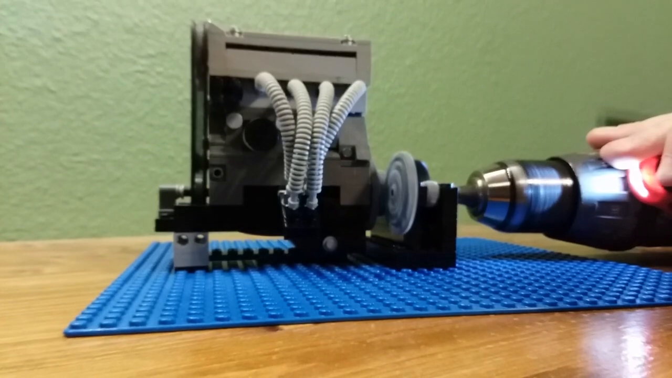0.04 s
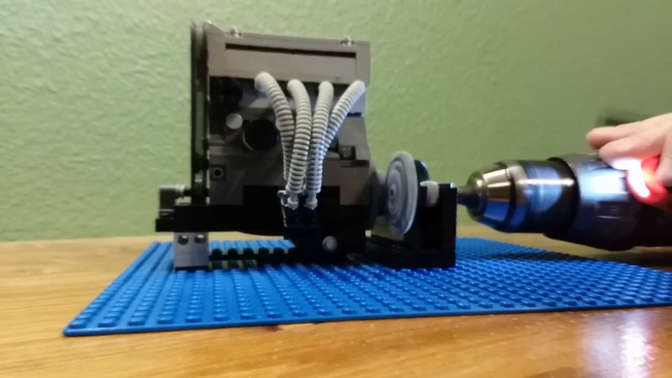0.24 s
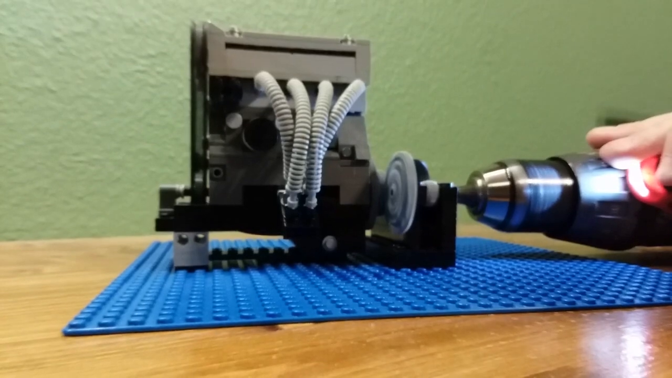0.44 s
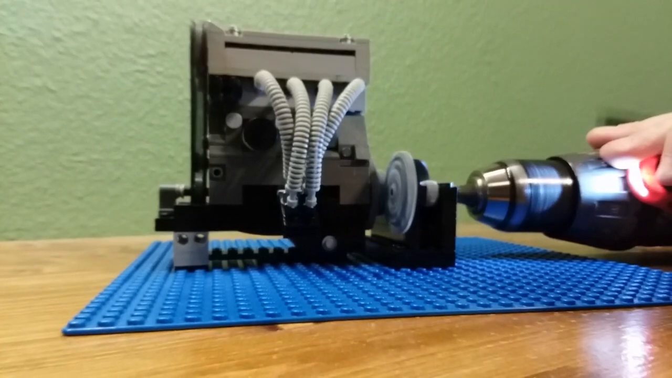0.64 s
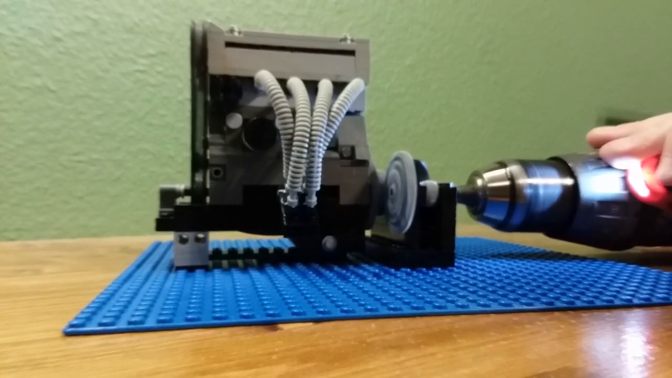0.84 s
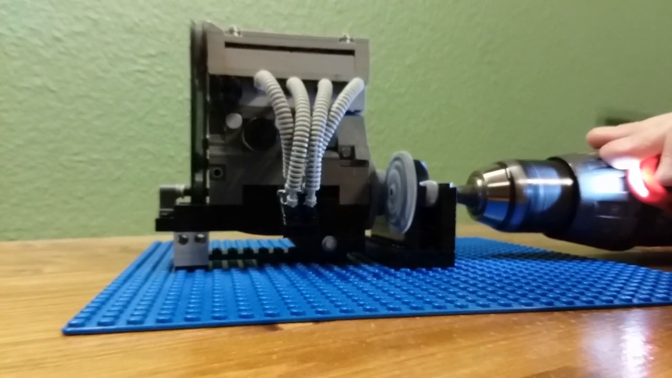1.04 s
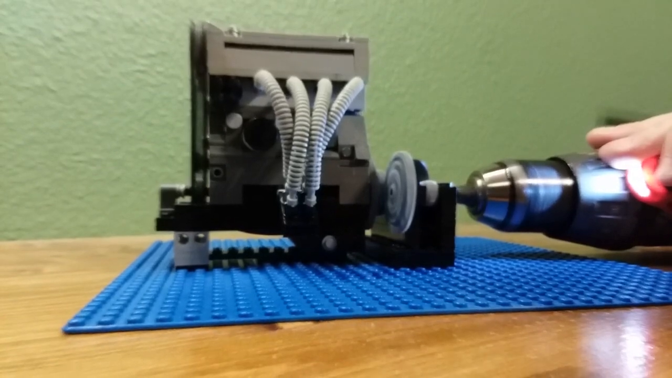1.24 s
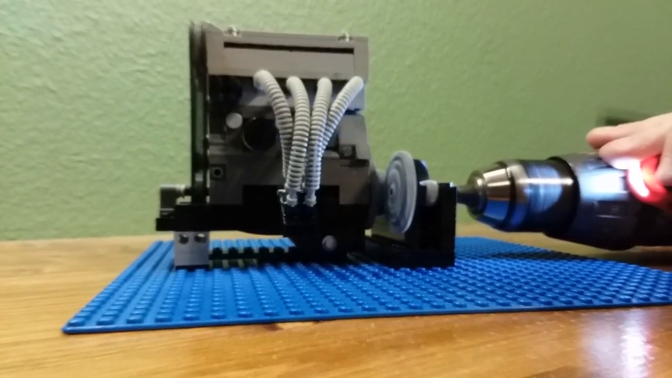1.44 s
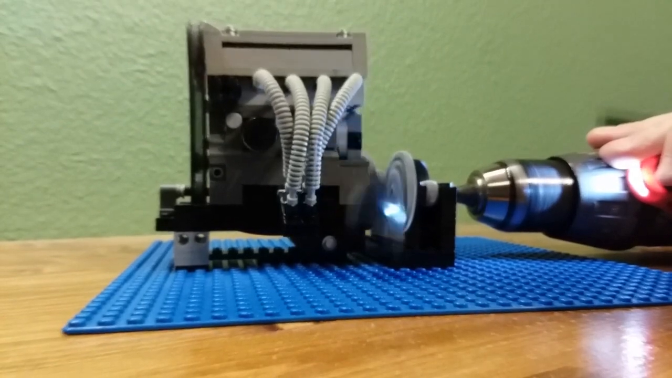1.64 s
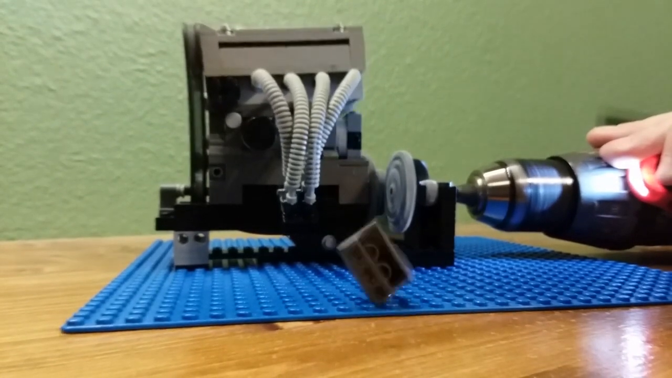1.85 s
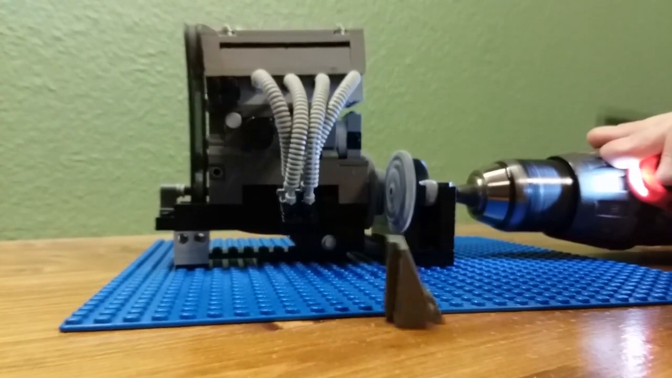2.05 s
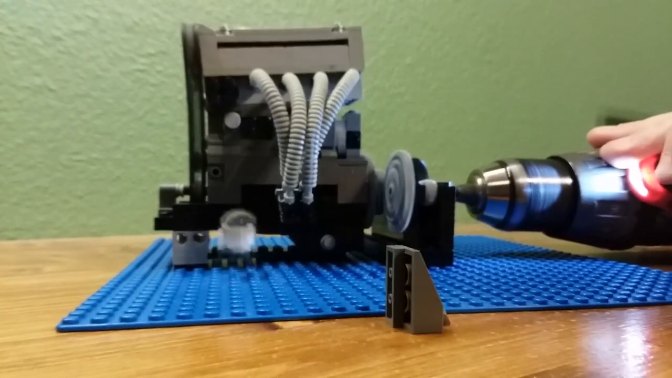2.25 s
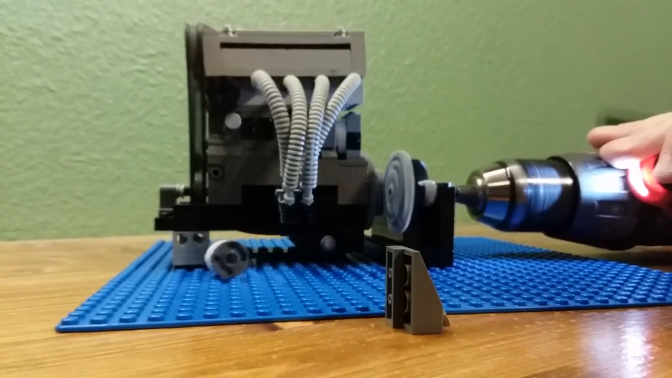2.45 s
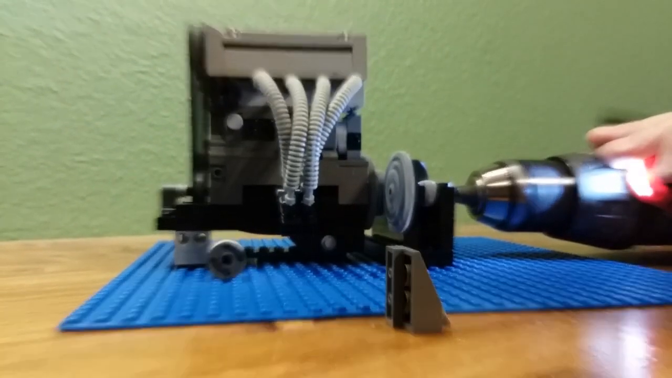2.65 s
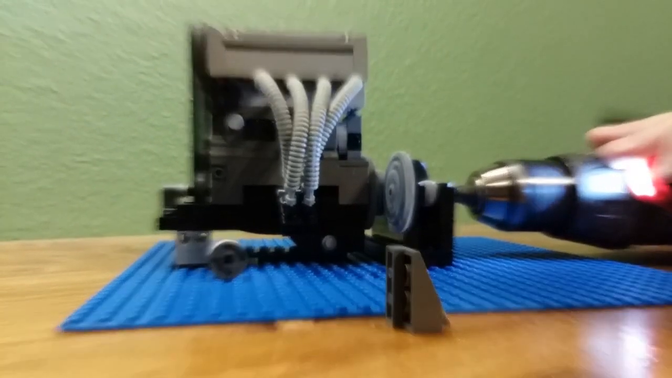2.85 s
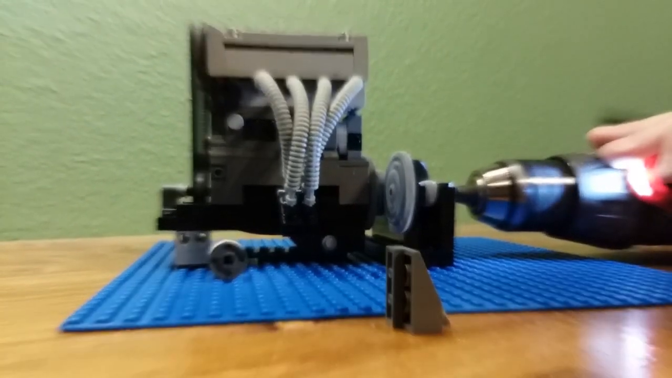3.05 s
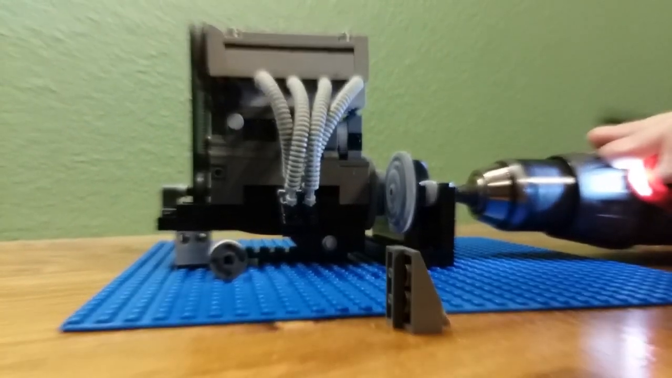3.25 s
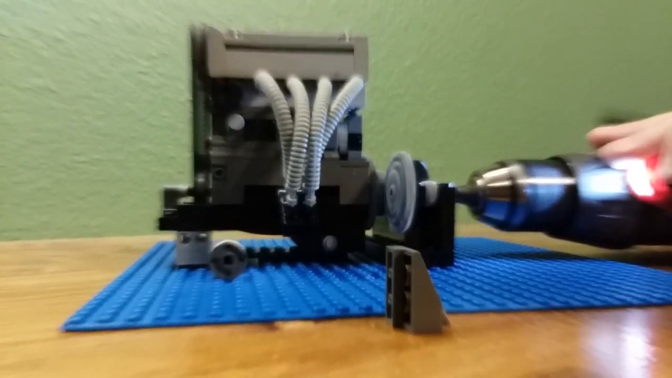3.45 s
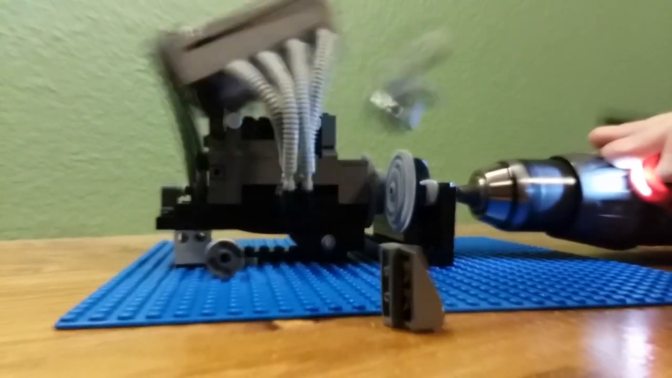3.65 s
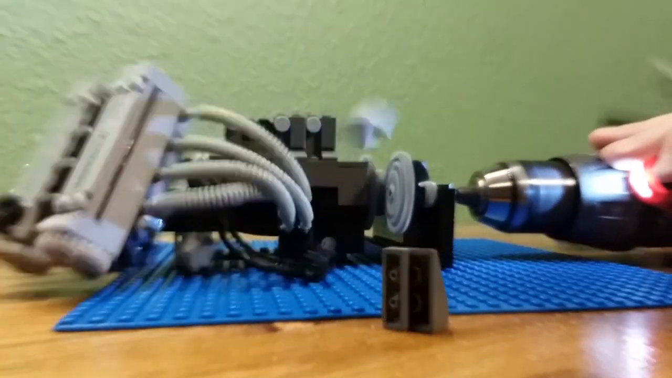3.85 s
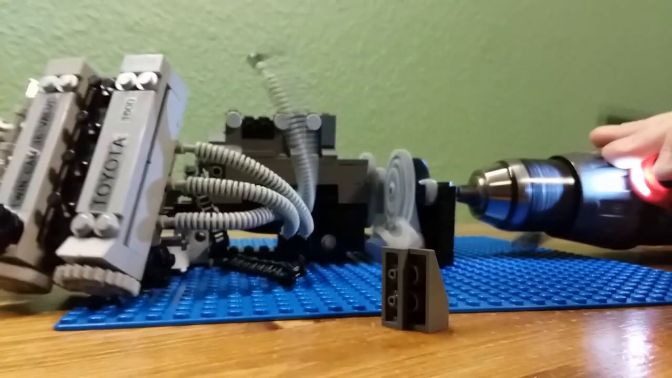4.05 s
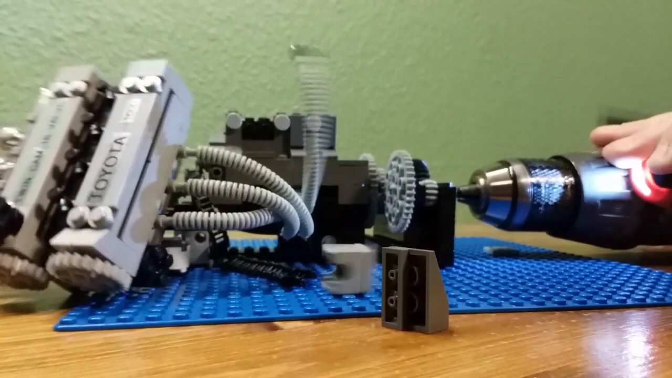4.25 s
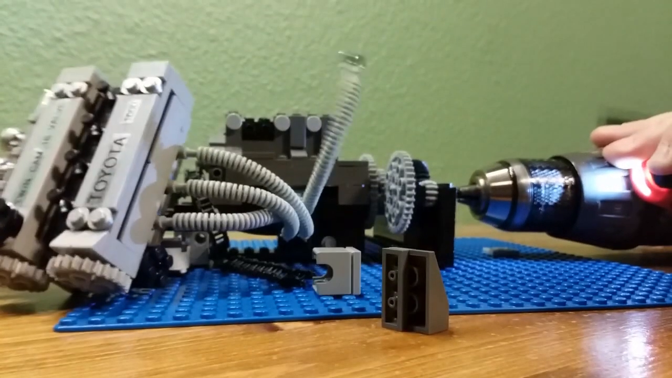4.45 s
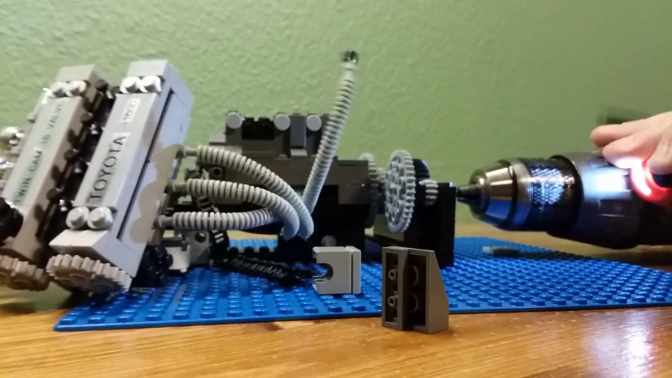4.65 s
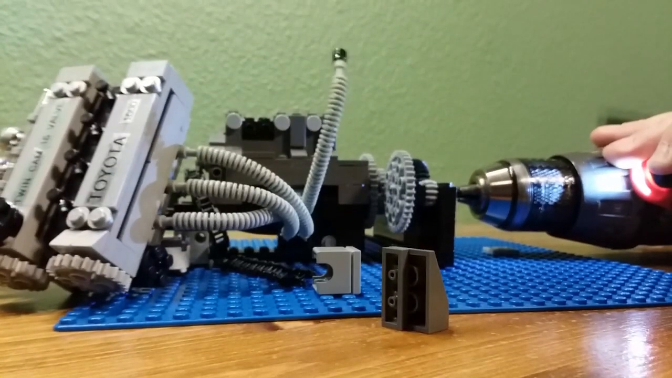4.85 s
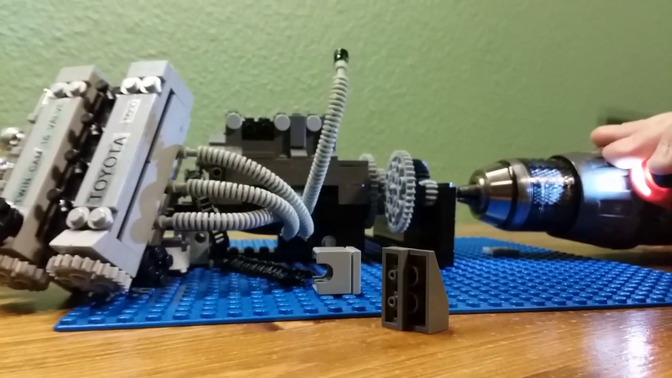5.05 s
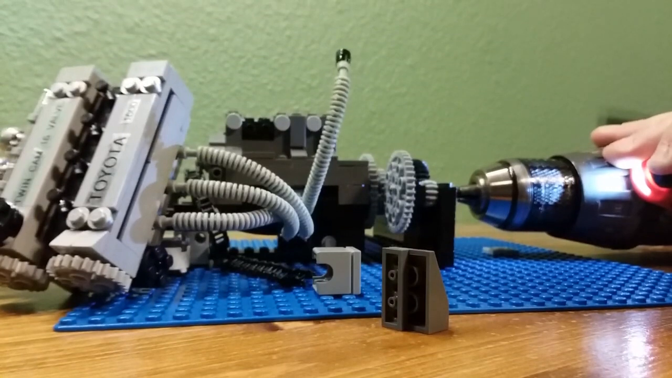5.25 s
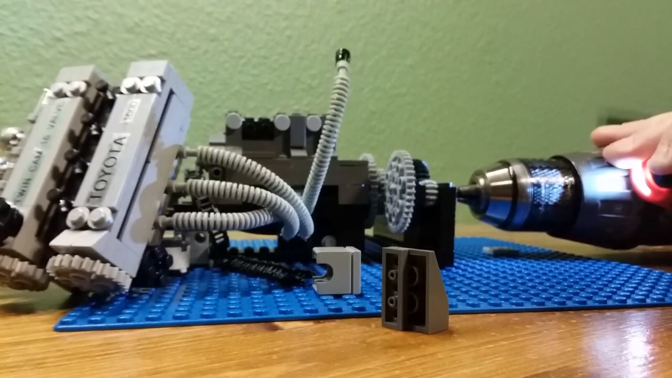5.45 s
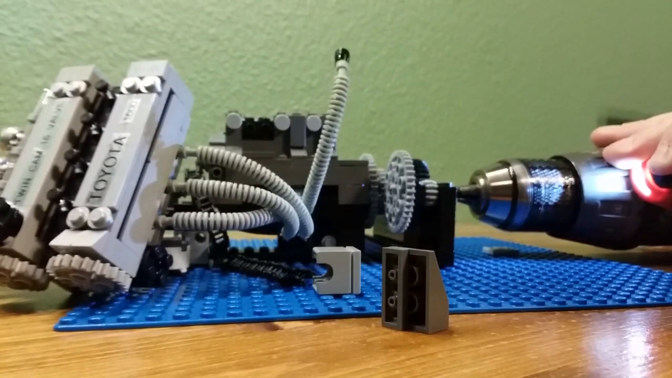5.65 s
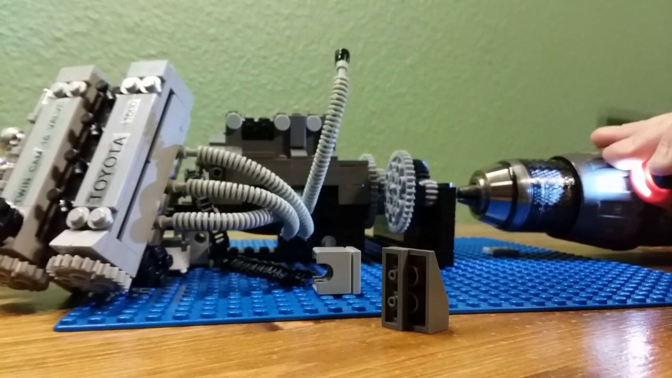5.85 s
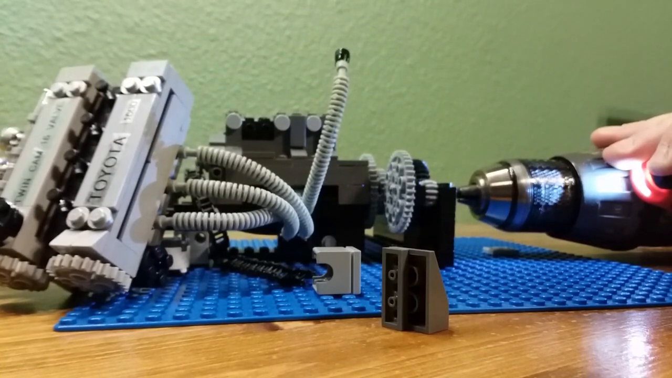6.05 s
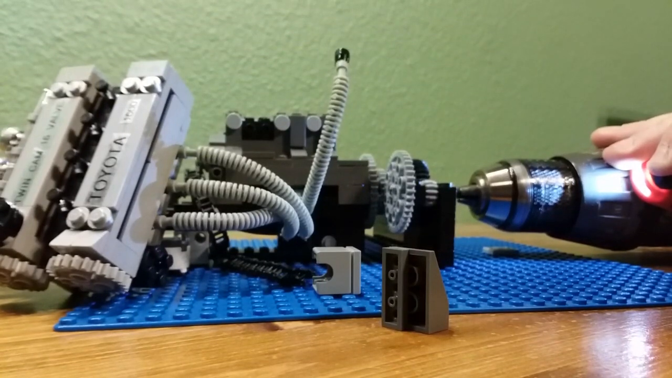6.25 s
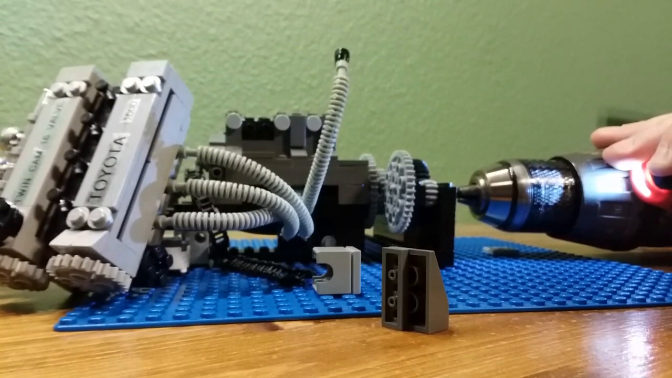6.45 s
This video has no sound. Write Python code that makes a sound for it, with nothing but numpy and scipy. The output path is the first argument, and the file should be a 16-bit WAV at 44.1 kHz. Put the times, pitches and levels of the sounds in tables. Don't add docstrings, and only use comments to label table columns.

```python
import sys
import numpy as np
from scipy import signal
from scipy.fft import rfft, irfft, next_fast_len
from scipy.io import wavfile
from scipy.ndimage import uniform_filter1d

SR = 44100
rng = np.random.default_rng(int(sys.argv[2]) if len(sys.argv) > 2 else 0)


def field_ratio(decibels):
    return 10 ** (np.asarray(decibels, dtype=float) / 20)


def digitize_waveform(pressure):
    field = np.atleast_2d(pressure).T
    bounded = np.clip(field, -1, 1)
    quanta = np.round(bounded * 32767).astype(np.int16)
    wavfile.write(sys.argv[1], SR, quanta)


N = 287091
TIME = np.arange(N) / SR
SURGE_S, BURST_S, RELEASE_S, STOP_S = 3.67, 3.75, 3.88, 4.26


def unit(x):
    return x / np.sqrt(np.mean(x ** 2))


def stereo(left, right):
    return np.array([[left], [right]])


def colour(x, hz, db):
    size = next_fast_len(x.shape[-1] + 4096)
    log_hz = np.log(np.arange(size // 2 + 1) * SR / size + 1)
    gain = field_ratio(np.interp(log_hz, np.log(hz), db))
    return irfft(rfft(x, size) * gain, size)[..., :x.shape[-1]]


def band(x, hz, width_hz):
    return signal.lfilter(*signal.iirpeak(hz, hz / width_hz, SR), x)


def walk(rate_hz):
    hold = int(SR / rate_hz)
    steps = np.repeat(rng.standard_normal(N // hold + 1), hold)
    return 1.3 * uniform_filter1d(uniform_filter1d(steps, hold), hold)[:N]


def ramp(start_s, length_s):
    return np.clip((TIME - start_s) / length_s, 0, 1)


def ports(make, shared, lag=20):
    shared = np.clip(shared, 0, 1)
    direct = make()
    return np.array([np.sqrt(shared) * np.roll(direct, k) + np.sqrt(1 - shared) * make() for k in (lag, 0)])


# (frequency [Hz], level [dB per Hz])
HUSH_SPECTRUM = [(18, -39), (30, -9), (93, -9), (165, -10.5), (183, -25), (392, -19), (566, -26.5),
                 (1660, -38.5), (10900, -46), (15800, -47)]


def hush():
    noise = unit(colour(rng.standard_normal((2, N)), *np.transpose(HUSH_SPECTRUM)))
    return noise * field_ratio(-68 + 1.5) * field_ratio(np.interp(TIME, [5.28, 5.5], [-8, 0]))


def room(x):
    t60_s, treble_t60_s, rise_s, level_db = 0.23, 0.18, 0.0021, -1.5
    t = TIME[:SR // 2]
    noise = rng.standard_normal((2, len(t)))
    low = colour(noise, [5000, 9000], [0, -30])
    tail = low * field_ratio(-60 * t / t60_s) + (noise - low) * field_ratio(-60 * t / treble_t60_s)
    tail = tail * (1 - np.exp(-t / rise_s))
    tail = tail / np.sqrt(np.sum(tail ** 2, axis=1, keepdims=True))
    return field_ratio(level_db) * signal.fftconvolve(x, tail, axes=1)[:, :N]


# (time [s], frequency [Hz], level [dB], T60 [s])
SINGING_PARTS = [(4.025, 3774, -25, .08), (4.29, 150, -41, .17), (4.307, 5950, -35, .2),
                 (4.362, 150, -34, .1), (4.43, 310, -48, .55), (4.45, 5860, -41, .2),
                 (4.581, 150, -55, .26), (4.728, 305, -58, .8), (4.861, 307, -59, .5),
                 (4.951, 312, -62, .5), (5.31, 5900, -40, .34), (5.329, 220, -50, .7),
                 (5.33, 115, -46, .75), (5.331, 880, -52, .65)]


def rings():
    out, t = np.zeros((2, N)), TIME[:SR // 2]
    for s, hz, db, t60_s in SINGING_PARTS:
        wander = np.cumsum(rng.standard_normal((2, len(t))), axis=1)
        wander = wander * np.sqrt(2 * np.pi * (5 + hz / 70) / SR)
        song = np.sqrt(2) * np.sin(2 * np.pi * hz * t + wander)
        i = int(s * SR)
        out[:, i:i + len(t)] += song * field_ratio(db - 60 * t / t60_s) * np.clip(t / 0.0055, 0, 1)
    return out


# (time [s], level [dB], hold [s], fade [dB per s])
SHOWERS_OF_BRICKS = [
    (3.9, -15, 0.15, 68),
    (4.728, -46, .01, 88.5),
    (4.856, -46, 0.15, 249.5),
]
# (frequency [Hz], level [dB per Hz])
BRICK_CLICK = [(80, -23), (150, -9.5), (310, 0.5), (450, -4), (1100, -3), (1700, -6), (2400, -4),
               (3300, -9), (4300, -14), (6000, -16.5), (7200, -20.5), (8800, -36.5), (11600, -21.5),
               (15800, -31)]


def skitter():
    gain = 0
    for s, db, hold_s, fade_db in SHOWERS_OF_BRICKS:
        fade = field_ratio(db - fade_db * np.clip(TIME - s - hold_s, 0, 1))
        gain = gain + (TIME > s) * fade * (TIME < s + 1)
    ticks = (rng.random((2, N)) < 200 / SR) * rng.standard_normal((2, N))
    ticks = colour(colour(ticks, *np.transpose(BRICK_CLICK)), [4000, 8000], [0, -16])
    return unit(ticks) * gain * field_ratio(-14.5 + stereo(1, -1))


# (time [s], peak level [dB], ring [Hz], treble [dB])
LOOSE_BRICKS = [(1.519, -14, 1920, 22), (2.039, -25, 1930, 5), (3.716, -12.5, 1670, 0),
                (3.739, -10.5, 2250, 2), (3.877, -12.5, 2220, 7), (4.082, -13, 4100, 6),
                (4.116, -17, 643, -3), (4.218, -25, 1720, 4), (4.235, -15, 1810, -7.5),
                (4.244, -25, 1190, -2), (4.269, -24.5, 1820, -2), (4.308, -23.5, 930, 9),
                (4.339, -20, 2290, 3), (4.369, -41, 2340, 14), (4.394, -30, 2290, -26),
                (4.419, -23.5, 1080, -7), (4.449, -32, 2520, 3), (4.478, -35, 1920, -2),
                (4.494, -28, 1240, -2), (4.53, -31, 1700, 1), (4.576, -27, 1350, -2),
                (4.722, -35.5, 2200, 0), (4.78, -41.5, 980, -1), (4.854, -36.5, 526, -37),
                (4.898, -41, 900, -30), (4.943, -37, 1320, -27.5), (5.013, -39, 1000, -29),
                (5.309, -23.5, 3400, -1), (5.318, -21.5, 850, -1.5), (5.334, -20.5, 3500, -3.5)]


def debris():
    near, far, t = np.zeros((2, N + 4096)), np.zeros((4, 2, N + 4096)), TIME[:4096]
    hz, db = np.transpose(BRICK_CLICK)
    for k, (s, peak_db, ring_hz, treble_db) in enumerate(LOOSE_BRICKS):
        crack = rng.standard_normal(len(t)) * field_ratio(-60 * t / 0.026)
        thud_db = -7 + 0.53 * (peak_db + 25)
        tilt = np.interp(hz, [350, 600, 3800, 8000], [thud_db, 0, 0, treble_db])
        hit = unit(colour(crack, hz, db + tilt)) + field_ratio(-11) * unit(band(crack, ring_hz, 150))
        hit = field_ratio(peak_db - 13 + stereo(1.75, -1.75)) * hit
        i = int(s * SR)
        far[k % len(far), :, i:i + len(t)] += hit
        direct = field_ratio(.45 * peak_db + 6.5 - 60 * t / .018) * np.clip(t / .001, 0, 1)
        near[:, i:i + len(t)] += hit * direct
    return near[:, :N] + sum(room(place[:, :N] + skitter()) for place in far)


# (time [s], level [dB])
HEAVY_PARTS = [
    (3.727, -28),
    (4.013, -9.5),
    (4.0318, -18),
]
# (frequency [Hz], level [dB], T60 [s])
WOOD_MODES = [(140, 0, .085), (320, -3, .15), (500, -1, .06), (590, -5, .045)]


def landings():
    out, t = np.zeros(N + 8192), TIME[:8192]
    knock = sum(field_ratio(db - 60 * t / t60_s) * np.sin(2 * np.pi * hz * t) for hz, db, t60_s in WOOD_MODES)
    knock = knock * np.clip(t / 0.0047, 0, 1)
    for s, db in HEAVY_PARTS:
        i = int(s * SR)
        out[i:i + len(t)] += field_ratio(db) * knock
    return out[:N] * field_ratio(stereo(1, -1))


# (time [s], piston beat [Hz])
BEAT_SPEED = [(0, 78.5), (.12, 79.6), (.85, 79.9), (1.17, 80.5), (2.05, 80), (2.41, 80.6), (2.525, 66),
              (2.63, 55.8), (2.75, 51), (3.08, 47.5), (3.45, 47.4), (3.56, 53), (3.62, 61), (3.69, 67),
              (3.72, 94), (3.745, 108), (3.85, 102), (3.905, 82)]


def speed():
    s, hz = np.transpose(BEAT_SPEED)
    return np.interp(TIME, s, hz) * np.exp(-np.clip(TIME - s[-1], 0, None) / .37)


def loudness(beat_hz, full_speed_db, per_octave_db, fade_db_s):
    octaves = np.minimum(np.log2(beat_hz / 80), .08)
    return full_speed_db + per_octave_db * octaves - fade_db_s * np.clip(TIME - RELEASE_S, 0, None)


# (start [s], length [s], loss [dB])
LOST_PARTS = [
    (1.559, 0.58, -4),
    (3.72, .08, -0.5),
]


def missing():
    return sum(db * ramp(s, length_s) for s, length_s, db in LOST_PARTS)


def wobble(phase):
    late = TIME - 3.84
    db = -14 + np.where(late < 0, 82, -704) * late
    return field_ratio(np.clip(db, -120, 0)) * ramp(3.69, .03) * np.sin(phase)


def load():
    both = -5 * np.exp(-TIME / .1) - 25 * ramp(4.05, .1)
    fast = 6 * ramp(SURGE_S, .05) - 15 * ramp(BURST_S, .02) + 9 * ramp(RELEASE_S, .03)
    return both + 1.3 * missing() + 0.27 * fast, both + fast


# (multiple of the beat, wobble share,
# low [Hz], high [Hz], left level [dB], right level [dB], left lag [samples])
GEAR_MESHES = [(24, .013, 1800, 2050, -25, -19, 23), (15.1, .007, 1150, 1300, -22, -34, 20),
               (41.7, .0012, 2680, 4600, -29.5, -25, 11), (52, .002, 2640, 2920, -32.5, -26.5, 11),
               (72.2, .001, 3300, 3600, -42, -36, 11), (20.9, .008, 1780, 2400, -18, -14, 20)]
# (frequency [Hz], level [dB])
HOUSING_RESPONSE = [(2450, 0), (2800, 4), (2950, -3), (3100, 2), (3230, -9), (3310, 0), (3500, -4),
                    (4600, 0)]


def whine(beat_hz):
    out, (slow_db, fast_db) = 0, load()
    for k, wobble_share, low_hz, high_hz, left_db, right_db, lag in GEAR_MESHES:
        hz = k * beat_hz
        outside_hz = np.clip(low_hz - hz, 0, None) + np.clip(hz - high_hz, 0, None)
        db = np.interp(hz, *np.transpose(HOUSING_RESPONSE)) - .12 * outside_hz + 2.1 * walk(50)
        db = db + (fast_db if k > 40 else slow_db)
        tone = field_ratio(db) * np.sin(np.cumsum(2 * np.pi * hz * (1 + wobble_share * walk(60)) / SR))
        out = out + field_ratio(stereo(left_db, right_db)) * np.array([np.roll(tone, lag), tone])
    return out


def grit(phase, depth, half, spread_db, grain_count):
    size = field_ratio(spread_db * rng.exponential(size=N // grain_count + 1))
    size = np.repeat(size, grain_count)[:N]
    gate = np.exp(depth * np.cos(2 * phase) + half * np.cos(phase))
    return unit(rng.standard_normal(N) * size * gate)


# (frequency [Hz], left level [dB], right level [dB])
MOTOR_SPECTRUM = [(500, -26.5, -7.5), (1610, 0, 2), (2680, -5.5, -4), (3970, -9, -8), (6050, -10, -10),
                  (7000, -6, -12.5), (7000, -12.5, -10), (9070, -20, -18), (11640, -13, -14.5),
                  (11050, -4.5, -21), (12000, -8.5, -11), (14100, -10, -13.5), (16500, -17.5, -14)]


def whirr(phase):
    hz, *sides = np.transpose(MOTOR_SPECTRUM)
    hiss = ports(lambda: grit(phase, 0.064, 0.12, 1.8, grain_count=40), 0.28)
    hiss = np.array([colour(h, hz, db) for h, db in zip(hiss, sides)])
    return unit(hiss) * field_ratio(walk(8.47))


# (multiple of the beat, left level [dB], right level [dB])
TABLE_BEATS = [(1, -27.5, -15.5), (2, 2, -6), (3, -9.5, -9.5), (4, -7, -12.5), (7, -17, -21),
               (7.18, -9, -22.5)]
# (frequency [Hz], level [dB])
TABLE_SHUDDER = [(25, -28.5), (45, -10), (90, -6.5), (150, 2.5), (220, -9), (320, -7.5), (480, -8.5),
                 (620, -9.5), (800, -14), (1100, -38.5)]


def rumble(phase):
    beats = 0
    for k, left_db, right_db in TABLE_BEATS:
        level = field_ratio(stereo(left_db, right_db) + 0.63 * walk(35))
        beats = beats + level * np.sin(k * phase + .3 * walk(25))
    shudder = ports(lambda: rng.standard_normal(N), 0.54, lag=0)
    shudder = unit(colour(shudder, *np.transpose(TABLE_SHUDDER)))
    return unit(beats * field_ratio(1) + shudder * field_ratio(1.5 * walk(7.7)))


# (frequency [Hz], width [Hz], left level [dB], right level [dB])
BRICK_WALLS = [(874.5, 63, -0.5, -1.5), (1102, 190, 2.5, -15), (1211.6, 106, 5, -12.5),
               (1333, 45, 2.5, -10.5), (1480, 160, -3, -3.5), (1670, 85, 3, -14), (2290, 360, -7.5, -8.5),
               (3060, 760, -11.5, -13.5)]


def rattle(phase):
    taps = ports(lambda: grit(phase, 0.13, .1, 2.0, grain_count=20), 0.39)
    out = 0
    for hz, width_hz, left_db, right_db in BRICK_WALLS:
        wall = band(band(taps, hz, 1.43 * width_hz), hz, 1.43 * width_hz)
        out = out + field_ratio(stereo(left_db, right_db) + 0.26 * walk(16)) * wall
    return unit(out)


def scene():
    hz = speed()
    phase = np.cumsum(2 * np.pi * hz / SR)
    rattle_db = loudness(hz, -15, 4, 30) + missing() - 3 * np.exp(-TIME / .04)
    rumble_db = loudness(hz, -20, 8, 20) - 1.5 * ramp(BURST_S, .05)
    rumble_db = rumble_db - 2 * np.clip(46 - hz, 0, None)
    motor_db = loudness(hz, -16.5, 3, 33)
    running = field_ratio(rattle_db) * rattle(phase) + field_ratio(rumble_db) * rumble(phase) + field_ratio(motor_db) * whirr(phase)
    running = running + whine(hz) + wobble(phase)
    running = running * field_ratio(-400 * np.clip(TIME - STOP_S, 0, 1))
    return running + debris() + rings() + landings() + hush()


def band_limit(x):
    return signal.sosfilt(signal.butter(12, 16970, fs=SR, output="sos"), x)


def record(dry):
    bass_cut = signal.butter(4, 48, "high", fs=SR, output="sos")
    top_cut = signal.ellip(10, .2, 70, 15800, fs=SR, output="sos")
    rounded = np.tanh(0.62 * signal.sosfilt(bass_cut, dry)) / 0.61
    mix = np.clip(signal.sosfilt(top_cut, rounded), -1, 1)
    return band_limit(mix)


dry = scene()
out = record(dry)
digitize_waveform(out)
```